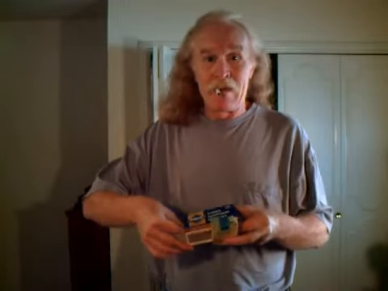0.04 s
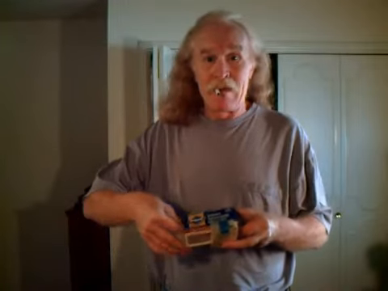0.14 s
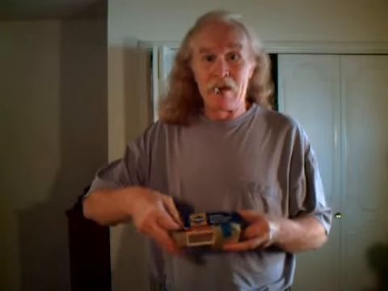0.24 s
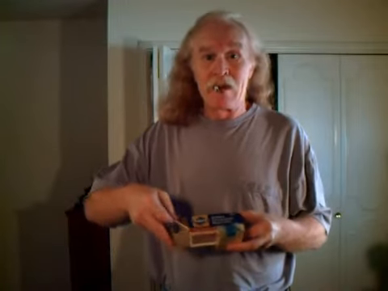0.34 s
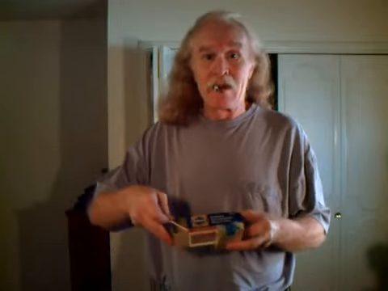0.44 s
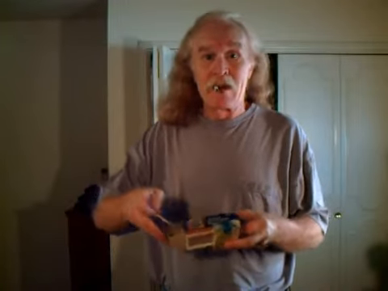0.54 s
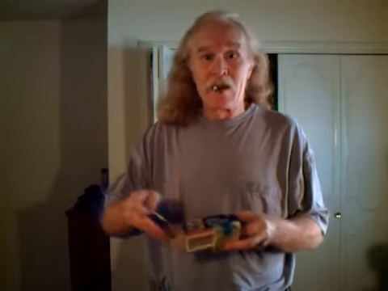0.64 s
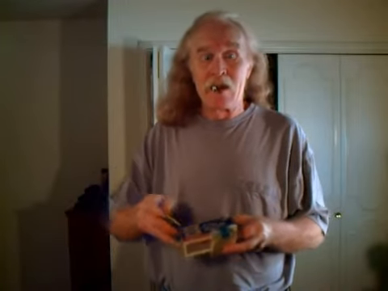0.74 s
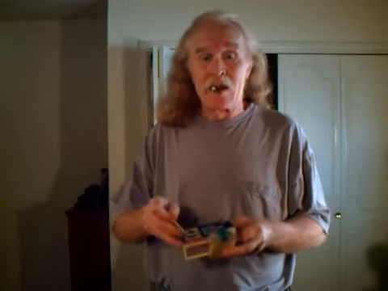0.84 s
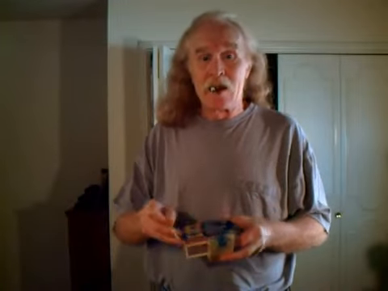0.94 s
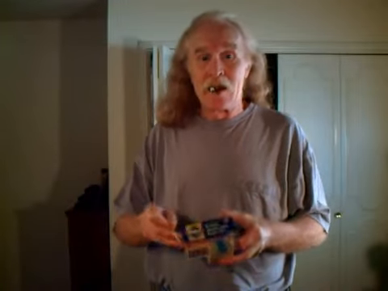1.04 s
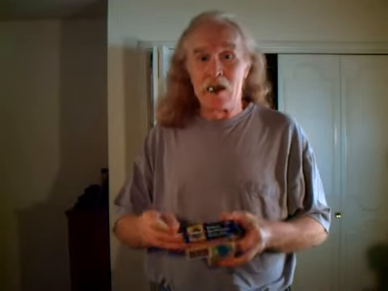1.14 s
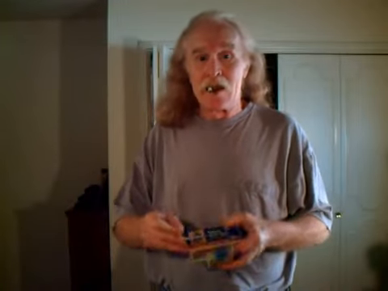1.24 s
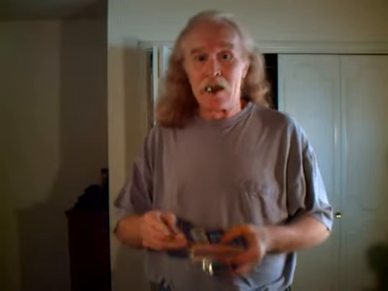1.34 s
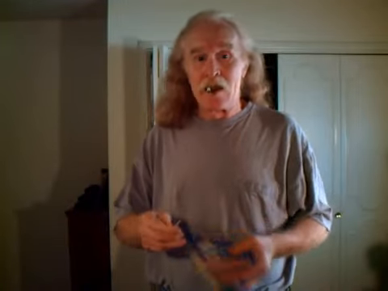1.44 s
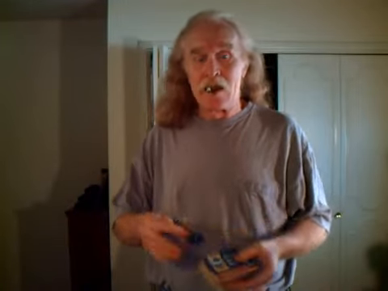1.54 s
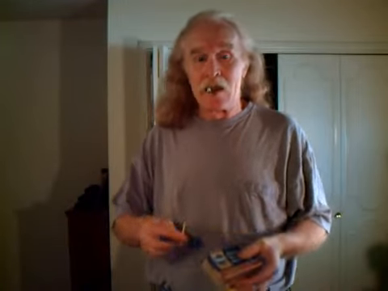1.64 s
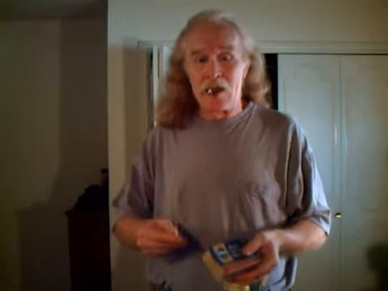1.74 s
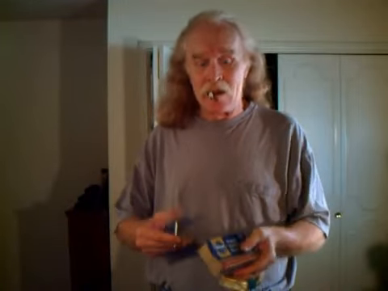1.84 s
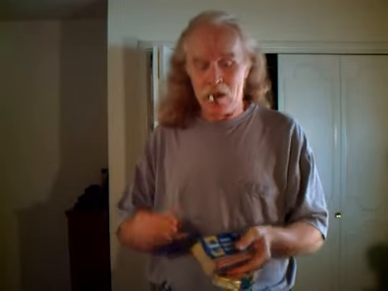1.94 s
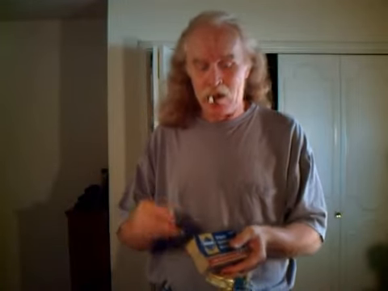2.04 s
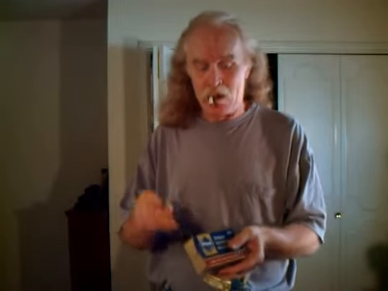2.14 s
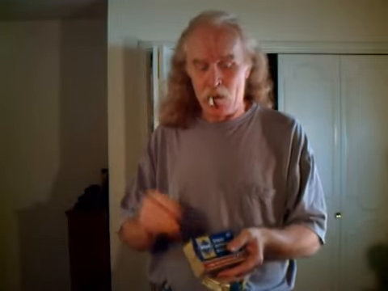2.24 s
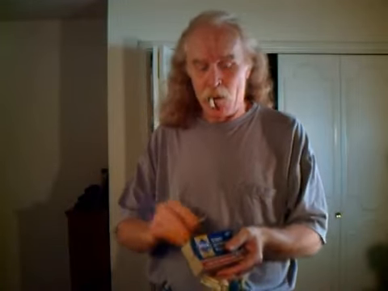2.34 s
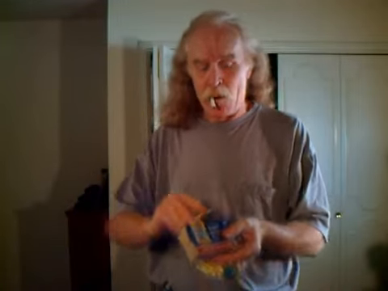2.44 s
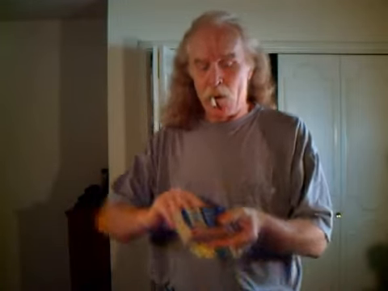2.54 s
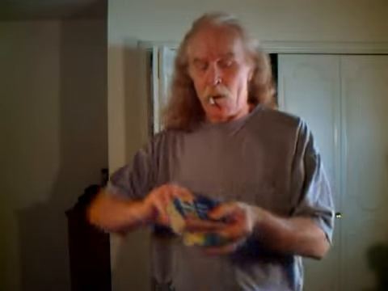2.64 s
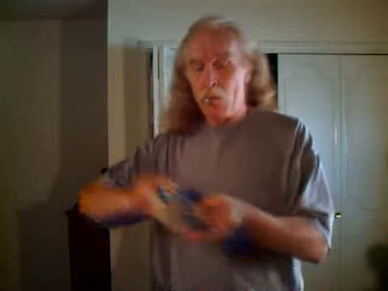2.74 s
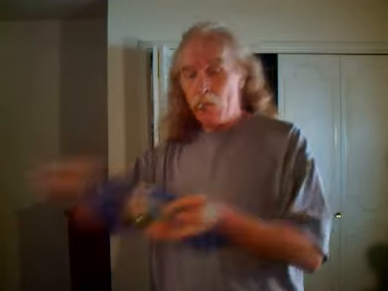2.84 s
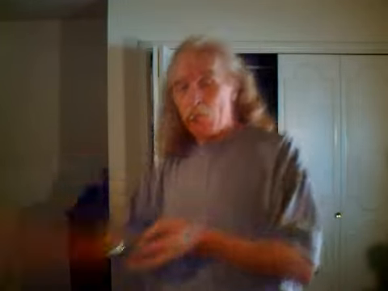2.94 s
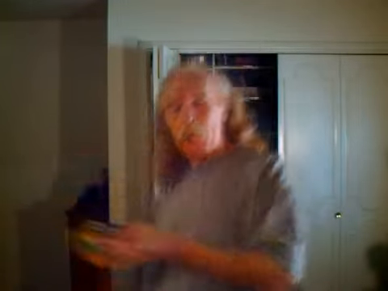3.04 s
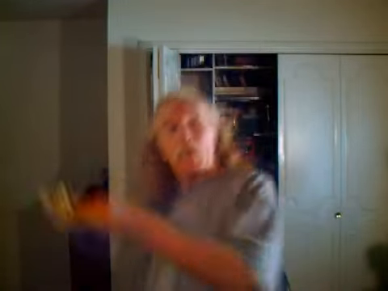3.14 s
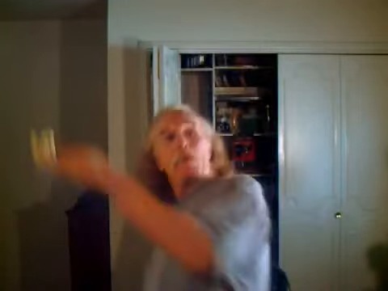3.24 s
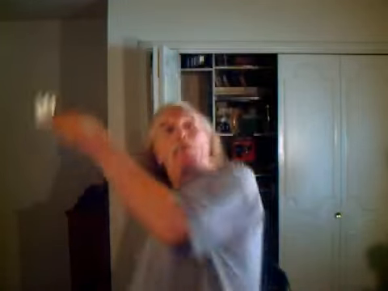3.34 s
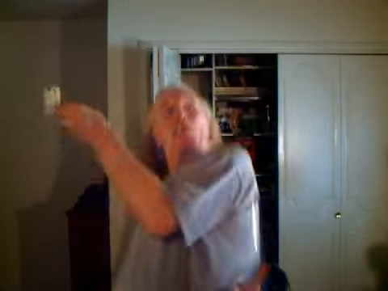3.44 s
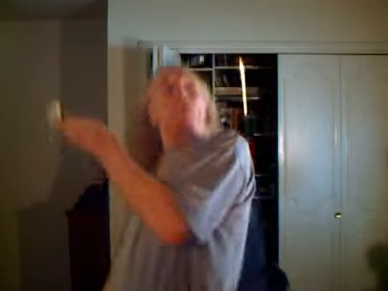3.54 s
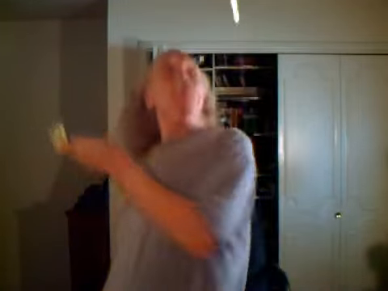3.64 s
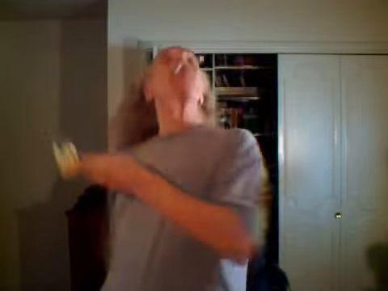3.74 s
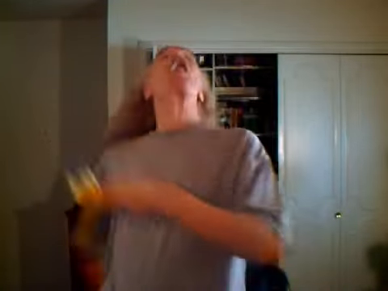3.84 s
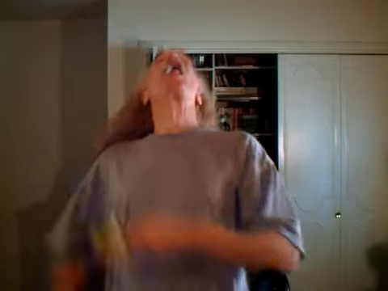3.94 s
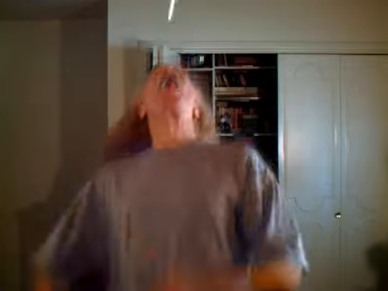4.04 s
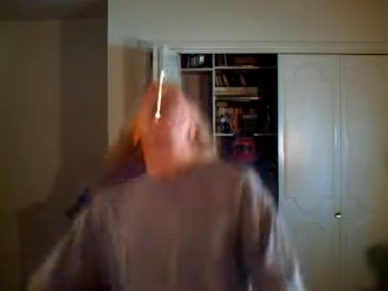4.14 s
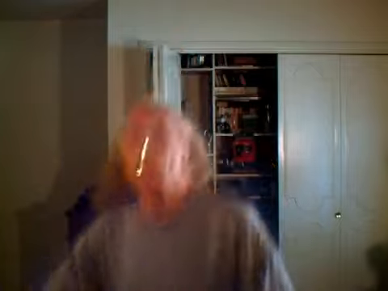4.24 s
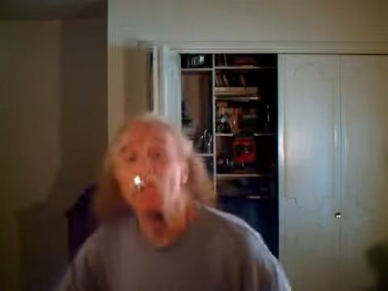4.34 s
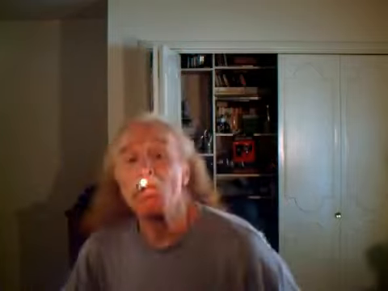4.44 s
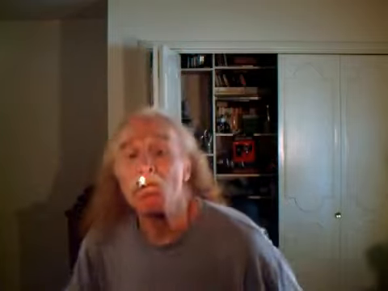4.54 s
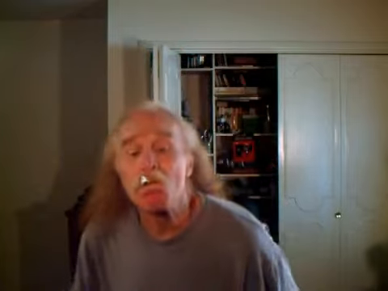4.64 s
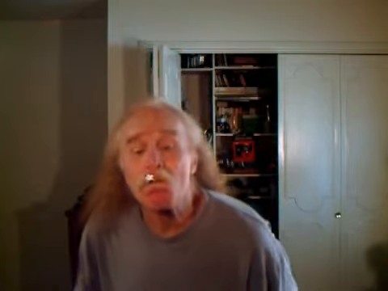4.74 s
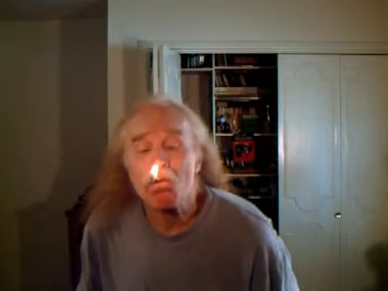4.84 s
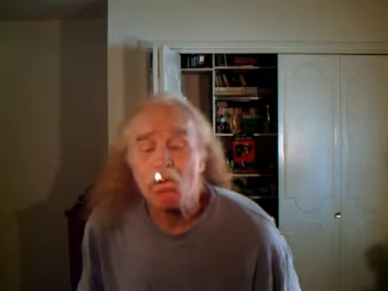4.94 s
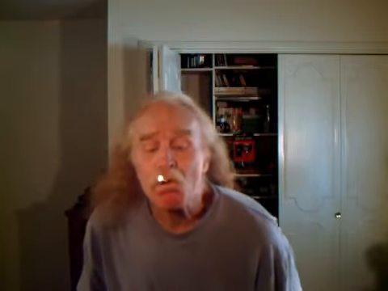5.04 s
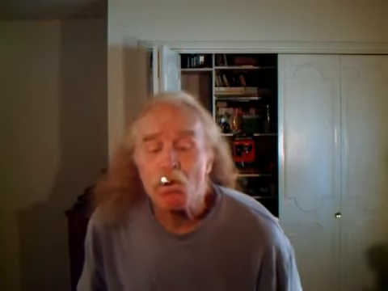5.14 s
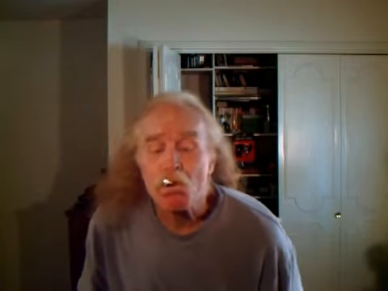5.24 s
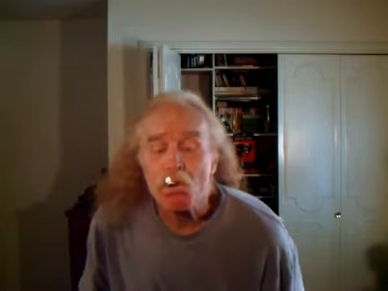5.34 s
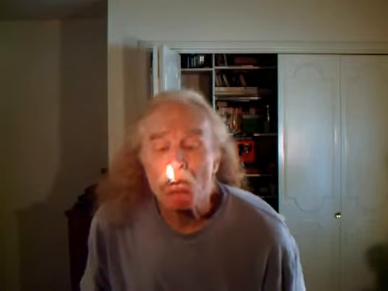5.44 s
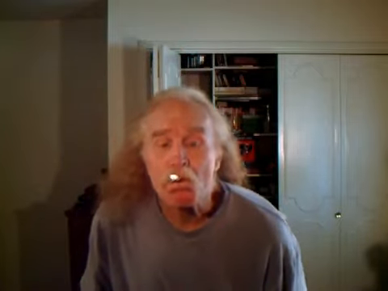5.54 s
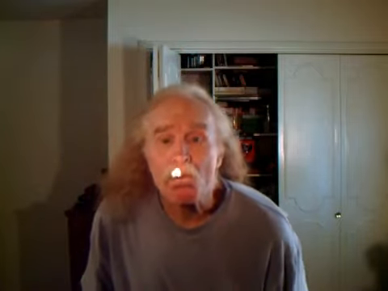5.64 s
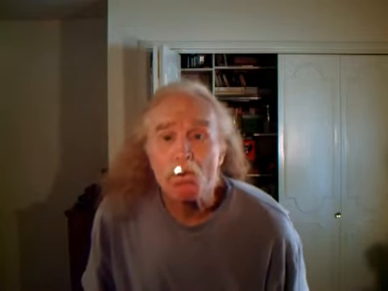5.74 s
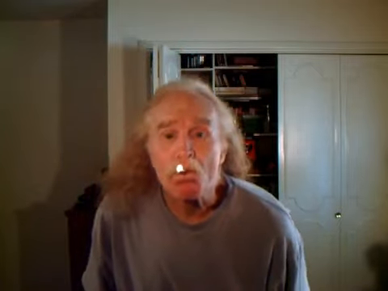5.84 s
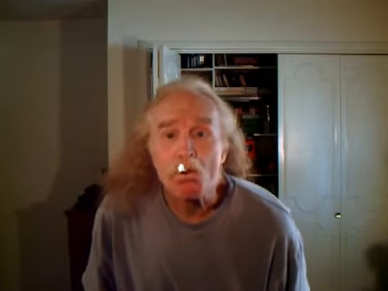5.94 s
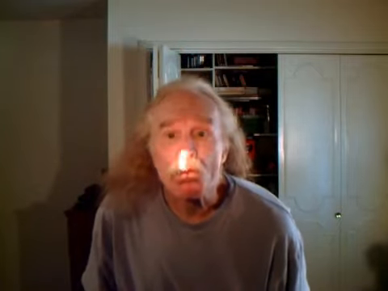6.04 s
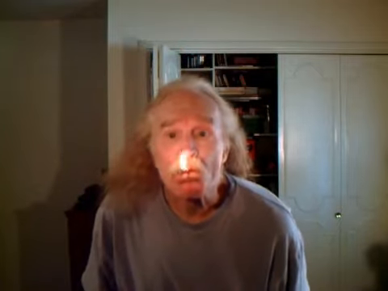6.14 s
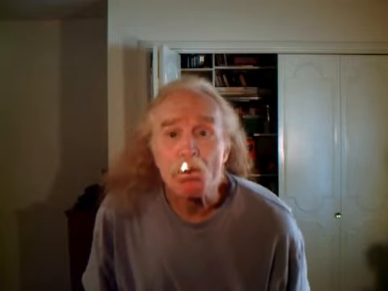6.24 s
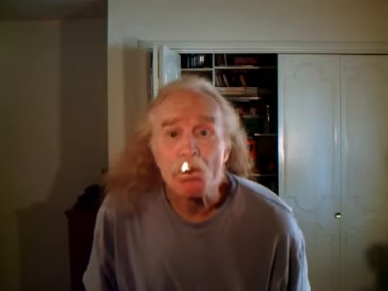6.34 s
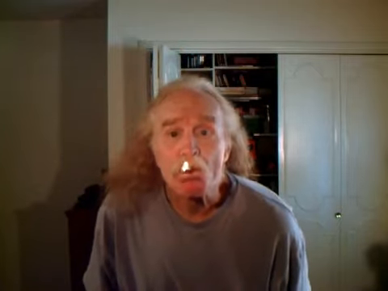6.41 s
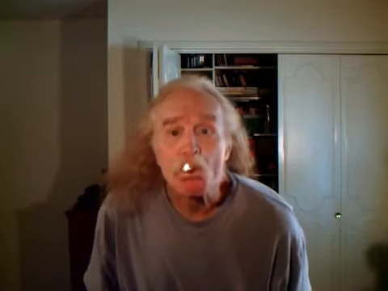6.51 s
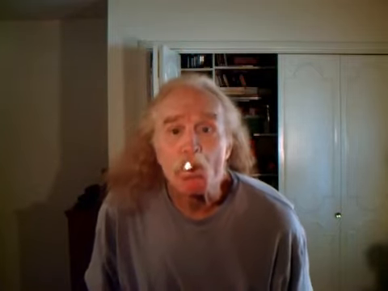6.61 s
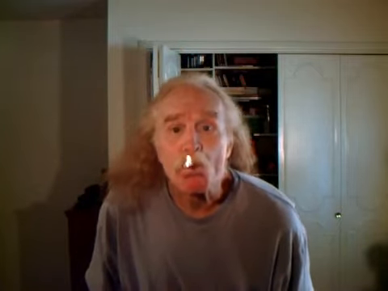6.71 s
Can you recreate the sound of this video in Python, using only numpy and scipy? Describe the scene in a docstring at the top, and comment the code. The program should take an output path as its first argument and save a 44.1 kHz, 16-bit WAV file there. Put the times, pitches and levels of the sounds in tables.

```python
"""A cardboard box of wooden matches is handled, swung and struck in a small room, close to a simple microphone.
Sticks tumble as random taps that ring the hollow box through resonances; harder knocks stand out of the rattle.
Single sticks ping as dying sines; bumps, the sliding tray and the swinging body are bands of noise and low tones.
Under it lie shaped room noise, a mains hum, a drone that comes and goes, thin whine lines and a throbbing hiss."""
import sys
import numpy as np
from scipy import signal
from scipy.fft import rfft, irfft
from scipy.io import wavfile
from scipy.ndimage import uniform_filter1d

SR = 44100
rng = np.random.default_rng(int(sys.argv[2]) if len(sys.argv) > 2 else 0)


def log_audio(samples):
    """Write samples as a 16-bit WAV file to the path given in sys.argv[1]."""
    # one column per channel
    frames = np.atleast_2d(samples).T
    # limit to full scale, then quantise
    limited = np.clip(frames, -1, 1)
    pcm = np.round(limited * 32767).astype(np.int16)
    wavfile.write(sys.argv[1], SR, pcm)


N = 298601

# shakes of the box, each building, holding and settling; the last two levels are against level_db:
# top_s, build_s, hold_s, level_db (low box modes, before the random waver), upper_modes_db, stick_clicks_db
SHAKES = [(0.0, .01, 0.005, -37, 4.5, -10.5), (0.163, 0.072, 0.084, -39.5, 8.5, -5),
          (0.517, 0.13, 0.12, -38.5, 6.5, -7), (0.624, 0.1, 0.091, -45, 15.5, 1),
          (0.75, 0.053, 0.039, -45, -1, -1.5), (0.822, 0.016, 0.012, -40.5, 10, -11.5),
          (0.946, 0.072, 0.022, -38.5, 0.5, -13), (1.023, 0.051, 0.054, -33.5, 8, -3),
          (1.233, 0.12, 0.081, -41, 4, -12), (1.357, 0.031, .06, -40.5, -1, -16.5),
          (1.462, 0.023, 0.062, -37.5, 1.5, -13.5), (1.573, 0.037, 0.031, -35.5, 1.5, -12),
          (1.643, .03, 0.05, -35, 3, -9), (1.794, .04, 0.067, -41, 3, -14),
          (2.037, 0.27, 0.23, -56.5, -1, -14), (2.702, .015, 0.23, -46, -4, -16),
          (2.86, 0.011, 0.048, -42, -8.5, -12), (2.913, 0.048, 0.043, -39.5, 6, -7.5),
          (3.047, 0.0086, 0.066, -24.5, 8.5, -2.5), (3.18, .06, 0.041, -25, 4.5, -7),
          (3.278, .05, 0.034, -32.5, 10.5, -1), (3.505, .15, 0.24, -43, -0.5, -9.5),
          (3.731, 0.09, 0.077, -32, 10, -4), (3.87, .03, .02, -43.5, 2, -3),
          (3.93, 0.018, 0.016, -45.5, 7, -3), (4.053, 0.11, 0.023, -37, 1.5, -11),
          (4.127, 0.14, 0.12, -40, 2.5, -7), (4.298, 0.056, 0.035, -34, 6, -4),
          (4.411, 0.088, 0.051, -32, 9.5, -5), (4.53, 0.051, 0.022, -33.5, 8, -4),
          (4.58, .03, 0.069, -40.5, 7, -8), (4.697, 0.013, .02, -49.5, 6, -1.5),
          (4.858, .15, 0.22, -52.5, -6, -19), (4.993, .01, .03, -48, 5, -3.5),
          (5.087, .04, .05, -59, 9, -2)]
# knocks of sticks on the box, the last two levels against level_db: start_s, level_db, upper_modes_db, sticks_db
KNOCKS = [(0.145, -24.5, 2, -8), (0.172, -17, -1, -15.5), (0.236, -22.5, -1, -11.5), (0.319, -38.5, 6, -2),
          (0.504, -28.5, 6.5, -7), (0.532, -31.5, 8.5, -16), (0.609, -19, 0, -13), (0.63, -15.5, 4.5, -23),
          (0.64, -23, 2, -20), (0.677, -17.5, 7, -5), (0.7, -48, -9, -9), (0.75, -27.5, 5.5, -13),
          (0.823, -24.5, 4, -10.5), (0.959, -25.5, -2.5, -12), (1.012, -25, -0.5, -9), (1.057, -20, 0, -13),
          (1.085, -19.5, -4, -26), (1.218, -32, 2, -12), (1.245, -25.5, -7, -21), (1.276, -24, -2, -25),
          (1.386, -27.5, -2.5, -20), (1.475, -20.5, 2, -13), (1.569, -31, 5.5, -13),
          (1.637, -20, -1.5, -16), (1.668, -21, -1, -11.5), (1.813, -28, 0, -11.5), (1.867, -27.5, -7, -22),
          (2.696, -25.5, -15, -26), (2.778, -36, -4, -17), (2.854, -24.5, 2.5, -9), (2.905, -24, -0.5, -12),
          (2.919, -22.5, 3.5, -13), (2.941, -24.5, 2, -8.5), (3.051, -11, -2, -5), (3.07, -9, -14, -18),
          (3.094, -5, -2, -13.5), (3.106, -12, 6, -10), (3.124, -15, 8, -7), (3.176, -15, 2, -8.5),
          (3.2, -15.5, -0.5, -8), (3.266, -15.5, -3, -19), (3.283, -11.5, -3.5, -14),
          (3.313, -13.5, 0, -11.5), (3.7, -23, -9, -19), (3.736, -17.5, -3, -13), (3.799, -27, 7, -15),
          (3.882, -31.5, 7.5, -13), (3.934, -37, 10, -13), (4.011, -30.5, -2, -10), (4.046, -27, 5, -16),
          (4.252, -28.5, 4, -14), (4.276, -23, -4, -18), (4.304, -16.5, -0.5, -14), (4.329, -20, 2.5, -10),
          (4.377, -26, 8, -13), (4.402, -21, 0, -7.5), (4.415, -11.5, 2, -7.5), (4.431, -6.5, -4, -17),
          (4.443, -9.5, -5, -16.5), (4.516, -11, -8, -18), (4.533, -17, 3, -7.5), (4.697, -28.5, 2, -13),
          (4.809, -47.5, 7.5, -7), (4.956, -33.5, -5.5, -18), (4.998, -24.5, -1.5, -18.5),
          (5.131, -44, 4, -3), (5.426, -42.5, -1.5, -13), (5.577, -46.5, 1, -16)]
# low modes of the hollow box: pitch_hz, width_hz, level_db
LOW_BOX_MODES = [(365, 41, -25), (547.3, 27, -5), (662.3, 82, 1.5), (763.7, 66, 4), (888, 73, -7)]
# upper modes of the hollow box: pitch_hz, width_hz, level_db
UPPER_BOX_MODES = [(1080, 140, 5), (1164, 250, 11.5), (1483, 320, 5), (1700, 300, 5), (1910, 370, -0.5)]
# the grip bends the box: time_s, low_pitch_factor, upper_pitch_factor
GRIP = [(0, 1.054, 0.97), (1.05, 1.034, 0.98), (1.3, 1.08, .97), (1.9, 1.01, 1.017), (2.7, 1.006, 0.98),
        (3.1, 0.967, 0.97), (3.4, 1.014, 1.054), (4.05, 0.946, 1.003), (4.45, 1.003, 1.047),
        (4.7, 1.06, 1.05), (5., 0.93, 0.97)]
# spectrum of clicking wood: pitch_hz, level_db
STICK_SPECTRUM = [(1500, -26.5), (2200, -1), (2500, -4.5), (2900, 0), (3600, -5.5), (4200, -4), (5200, -10),
                  (6000, -11), (6900, -9.5), (8200, -14.5), (9200, -18.5), (10200, -26)]
# single sticks that ring with a clear note:
# start_s, level_db (before the random flicker), pitch_hz, upper_note_db (against the first note)
PINGS = [(0.5038, -38, 2750, -13), (0.629, -36, 2950, -7), (0.75, -37, 4450, -5), (0.957, -42, 2870, -7),
         (1.0576, -40, 3090, -7), (2.1724, -48, 2630, -8), (2.9186, -39, 4200, -2.5),
         (3.052, -16.5, 2930, -6), (3.0697, -21, 2930, -16), (3.095, -17, 4150, -2.5),
         (3.1637, -21, 3000, -11), (3.1765, -17, 2910, -13), (3.1896, -23.5, 4100, -5),
         (3.7958, -35, 3080, -12), (4.128, -34, 3930, -5), (4.147, -32, 4150, -5.5),
         (4.1663, -39, 2860, -6), (4.1834, -44, 4060, -6), (4.2485, -47, 3960, -8),
         (4.2734, -37, 2940, -10), (4.288, -37, 2880, -11), (4.3044, -25.5, 2860, -16),
         (4.3317, -33, 2620, -11), (4.512, -26, 4450, -5.5)]
# soft bumps around the deepest note of the box: top_s, build_s, hold_s, level_db
BUMPS = [(0.023, .03, .05, -59), (0.167, .03, 0.066, -55), (2.69, .01, 0.013, -52),
         (3.072, 0.038, 0.055, -41), (3.18, .03, 0.024, -48), (3.502, 0.053, .04, -55.5),
         (3.716, 0.044, 0.086, -52.5), (4.016, .015, 0.027, -51), (4.166, .04, 0.042, -56)]
# tray sliding in its sleeve: time_s, level_db, pitch_hz
TRAY_SLIDE = [(4.1, -55, 1240), (4.13, -45.5, 1290), (4.19, -42.5, 1390), (4.23, -43, 1230),
              (4.27, -40, 1235), (4.33, -29.5, 1100), (4.36, -50, 1130)]
# low rumble of the body swinging: top_s, build_s, hold_s, level_db
BODY_SWINGS = [(2.957, 0.18, 0.12, -55.5), (3.283, .1, 0.15, -53.5), (3.69, 0.1, 0.032, -52),
               (4.324, 0.18, .12, -59), (4.613, 0.21, 0.019, -57), (5.025, .1, 0.055, -66.5)]
# low drone that comes and goes: top_s, build_s, hold_s, level_db
DRONE_SWELLS = [(3.3, .06, 0.018, -48), (3.6, 0.09, 0.18, -62), (4.05, .2, 0.97, -57)]
# decay of the room: pitch_hz, t60_s
ROOM_DECAY = [(300, 0.7), (800, 0.47), (2000, 0.42), (6000, 0.36)]
# spectrum shape of the air noise: pitch_hz, level_db (per Hz, relative)
AIR_SPECTRUM = [(15, -25.5), (25, -2.5), (60, -11), (100, -10), (150, -16), (230, -22.5), (400, -22),
                (1100, -23.5), (1500, -28.5), (3000, -29.5), (4400, -32.5), (6500, -36), (8000, -38.5),
                (9200, -51), (10200, -64.5)]
# steady whine lines: pitch_hz, level_db
WHINE_LINES = [(2000.5, -66), (4000.7, -87.5), (7025, -98.5), (9027, -85.5)]
# bands of the throbbing hiss, before its steps: pitch_hz, width_hz, level_db
THROB_BANDS = [(3000, 500, -82), (5050, 650, -76), (5950, 650, -76)]
# the four steps in every tenth of a second: level_db
THROB_STEPS = [7.5, -6, 4.5, 0.5]

SHAKE_CLIMB_DB, SHAKE_FALL_DB_PER_S, CLICK_FALL_DB_PER_S = 19.5, 258, 333.5
PING_T60_S, PING_RISE_S, PING_UPPER_HZ = 0.033, 0.0016, 6890
THUD_S, THUD_DB, THUD_HZ = 3.266, -28.5, 151
THUD_ARCH = 0.23  # share by which the thud's pitch arches up
AIR_DB, HUM_HZ, HUM_DB = -54.5, 119.3, -58.5
FAN_TONE_HZ, FAN_TONE_WIDTH_HZ, FAN_TONE_DB = 340, 41, -64  # a fuzzy fan-like tone
BAND_EDGE_HZ = 10266


def box():
    """Rattle and knocks ring the hollow box, whose pitch shifts with the grip, and the sticks."""
    low, upper, bright = knocks() + rattle()
    card = ring(low, LOW_BOX_MODES, follow(GRIP, 1))
    card += ring(upper, UPPER_BOX_MODES, follow(GRIP, 2))
    # the box is too small to radiate bass
    high_pass = signal.butter(3, 310, "high", fs=SR, output="sos")
    card = signal.sosfilt(high_pass, card)
    return card + colour(bright, STICK_SPECTRUM) + pings() + bumps()


def rattle():
    """Loose sticks tap the walls: the drive of the low box modes, the upper box modes and the sticks."""
    fall = np.array([[SHAKE_FALL_DB_PER_S], [SHAKE_FALL_DB_PER_S], [CLICK_FALL_DB_PER_S]])
    power = 0
    for top_s, build_s, hold_s, level_db, upper_db, clicks_db in SHAKES:
        shape = swell(top_s, build_s, hold_s, level_db, SHAKE_CLIMB_DB, fall)
        power = power + (shape * gain_of([[0], [upper_db], [clicks_db]])) ** 2
    # the rattle sits below its listed level and wavers at random
    waver_db = -3.2 * (1.5 + np.tanh(wander(54)))
    level = np.sqrt(power) * gain_of(waver_db)
    taps = tumble(per_s=450, spread_db=1.5, scuff=0.54)
    # sticks also click on each other
    clicks = evened(taps + 1.37 * tumble(per_s=1500, spread_db=6.0, scuff=0.97))
    return level * np.array([taps, taps, clicks])


def tumble(per_s, spread_db, scuff):
    """Random taps of very unequal size over a sliding scuff."""
    size = gain_of(spread_db * np.minimum(rng.exponential(1, N), 4))
    size *= rng.choice([-1., 1.], N)
    taps = evened(size * (rng.random(N) < per_s / SR))
    return evened(taps + scuff * rng.standard_normal(N))


def knocks():
    """Each knock is a firm blow on the card, its rebound and a clump of small taps."""
    length = 800
    t = np.arange(length) / SR
    chance = rng.standard_normal((len(KNOCKS), length + 1))
    clumps = chance[:, 1:] * np.exp(-t / 0.011) * np.minimum(t / 0.00063, 1)
    clumps *= 0.33 / np.sqrt(np.mean(clumps[:, :130] ** 2, axis=1))[:, None]
    rebound_at = np.round(SR * (0.00303 + 0.00163 * np.tanh(chance[:, :1])))
    blows = 5.15 * (t == 0) + 3.9 * (np.arange(length) == rebound_at) + 0.48 * clumps
    drive = np.zeros((3, N))
    for (start_s, db, upper_db, sticks_db), blow, clump in zip(KNOCKS, blows, clumps):
        i = round(start_s * SR)
        gains = gain_of([[db], [db + upper_db], [db + sticks_db]])
        drive[:, i:i + length] += gains * [blow, blow, clump]
    return drive


def pings():
    """Two dying notes for each ringing stick, their level flickering at random so they sound rough."""
    t, out = np.arange(2000) / SR, np.zeros(N)
    for start_s, db, hz, upper_db in PINGS:
        notes = np.sin(2 * np.pi * hz * t)
        notes += gain_of(upper_db) * np.sin(2 * np.pi * PING_UPPER_HZ * t)
        decay = gain_of(db - 60 * t / PING_T60_S)
        out[round(start_s * SR):][:2000] += decay * np.minimum(t / PING_RISE_S, 1) * notes
    flicker = 0.71 + 0.73 * wander(300)
    return out * flicker


def bumps():
    """Short swells of noise around the deepest box note."""
    level = sum(swell(*row, climb_db=19.5, fall_db_per_s=401) for row in BUMPS)
    return level * fuzz(366, 120)


def slide():
    """Friction noise whistles in the air space of the box, its pitch gliding as the space shrinks and grows."""
    level = during(TRAY_SLIDE) * gain_of(follow(TRAY_SLIDE, 1))
    return level * fuzz(follow(TRAY_SLIDE, 2), 220)


def thud():
    """The dull thud of the swing: a short rough low tone whose pitch rises and falls back."""
    t = np.arange(N) / SR
    hz = THUD_HZ * (1 + THUD_ARCH * np.exp(-((t - THUD_S - 0.035) / 0.036) ** 2))
    tone = np.sin(2 * np.pi * np.cumsum(hz) / SR)
    tone = tone + 0.37 * fuzz(0.77 * hz, 62) + 0.27 * fuzz(2 * hz, 106)
    level = swell(THUD_S + 0.018, 0.028, 0.018, THUD_DB, climb_db=2, fall_db_per_s=420)
    level = uniform_filter1d(level * (t > THUD_S), size=400)  # softens the onset
    return level * evened(tone)


def rumble():
    """Dull low noise while the body swings."""
    level = sum(swell(*row, climb_db=16.5, fall_db_per_s=109) for row in BODY_SWINGS)
    return level * fuzz(176, 81)


def room(x):
    """Echo of sparse taps of random sign, each band dying at its own speed."""
    taps = np.zeros(SR // 2)
    at = np.arange(200, SR // 2 - 20, 20) + rng.integers(0, 20, (SR // 2 - 201) // 20)
    taps[at] = rng.choice([-1., 1.], len(at))
    hz, t, bands = signal.stft(taps, SR, nperseg=256)
    decay = gain_of(-60 * t / read(ROOM_DECAY, hz)[:, None])
    tail = signal.istft(bands * decay, SR, nperseg=256)[1]
    return signal.fftconvolve(x, tail / np.linalg.norm(tail))[:N]


def drone():
    """A sine pitched below the hum, wavering in pitch and level, that swells and fades."""
    tone = np.sin(2 * np.pi * np.cumsum(98 + 2.62 * wander(6.8)) / SR)
    tone *= 1 + 0.23 * wander(7.8)
    level = sum(swell(*row, climb_db=17.5, fall_db_per_s=112) for row in DRONE_SWELLS)
    return evened(tone) * level


def background():
    """Shaped room and circuit noise, a hum that wavers a little, a fuzzy tone and steady whine lines."""
    hz, t = np.fft.rfftfreq(N, 1 / SR), np.arange(N) / SR
    shaped = irfft(rfft(rng.standard_normal(N)) * gain_of(read(AIR_SPECTRUM, hz)), N)
    air = gain_of(AIR_DB) * evened(shaped)
    hum_level = gain_of(HUM_DB + 1.2 * np.tanh(wander(10)))
    hum = hum_level * np.sqrt(2) * np.sin(2 * np.pi * HUM_HZ * t + 0.2 * wander(5.4))
    fan_tone = gain_of(FAN_TONE_DB) * fuzz(FAN_TONE_HZ, FAN_TONE_WIDTH_HZ)
    whine = sum(gain_of(db) * np.sqrt(2) * np.sin(2 * np.pi * f * t) for f, db in WHINE_LINES)
    return air + hum + fan_tone + whine


def throb():
    """High hiss switched in uneven steps, in a pattern that repeats ten times a second."""
    step = ((np.arange(N) / SR + 0.045) * 40).astype(int)
    chance_db = 2.1 * np.tanh(rng.standard_normal(step[-1] + 1))
    step_db = np.array(THROB_STEPS)[step % 4] + chance_db[step]
    hiss = sum(gain_of(db) * fuzz(hz, width) for hz, width, db in THROB_BANDS)
    return uniform_filter1d(gain_of(step_db), size=150) * hiss


def gain_of(db):
    """Decibels to amplitude."""
    return 10 ** (np.asarray(db) / 20)


def evened(x):
    """Scales to rms 1."""
    return x / np.sqrt(np.mean(x ** 2) + 1e-20)


def read(points, hz):
    """Reads a spectrum on a log-frequency axis."""
    f, value = np.transpose(points)
    return np.interp(np.log(hz + 1), np.log(f + 1), value)


def follow(rows, column):
    """One column of a curve at every sample."""
    rows = np.asarray(rows)
    return np.interp(np.arange(N) / SR, rows[:, 0], rows[:, column])


def during(rows):
    """One while a curve lasts, else zero."""
    t = np.arange(N) / SR
    return (t >= rows[0][0]) & (t < rows[-1][0])


def swell(top_s, build_s, hold_s, db, climb_db, fall_db_per_s):
    """An amplitude that climbs to its top, holds and dies away, in straight lines of decibels."""
    t = np.arange(N) / SR - top_s
    climb = climb_db * np.minimum(t, 0) / max(build_s, 0.001)
    fall = fall_db_per_s * np.maximum(t - hold_s, 0)
    return gain_of(db + climb - fall)


def resonate(x, hz, width, order=1):
    """Shifts the pitch hz down to zero, smooths, and shifts back: a resonance, steeper with order."""
    turn = np.exp(2j * np.pi * np.cumsum(hz * np.ones(len(x))) / SR)
    r = np.exp(-np.pi * width / SR)
    smooth = signal.lfilter([(1 - r) ** order], np.poly([r] * order), x / turn)
    return 2 * (turn * smooth).real


def ring(x, modes, pitch):
    """A set of steep modes, scaled so that white drive of rms 1 comes out near rms 1."""
    out = sum(gain_of(db) * resonate(x, hz * pitch, width, order=2) for hz, width, db in modes)
    power = sum(gain_of(2 * db) * np.pi * width / SR for hz, width, db in modes)
    return out / np.sqrt(power)


def colour(x, points):
    """Causal filter of the given spectrum and energy 1: phase from the Hilbert transform of the log gain."""
    log_gain = np.log(gain_of(read(points, abs(np.fft.fftfreq(4096, 1 / SR)))))
    taps = np.fft.ifft(np.exp(np.conj(signal.hilbert(log_gain)))).real[:1024]
    return signal.oaconvolve(x, taps / np.linalg.norm(taps))[:N]


def wander(hz):
    """Smoothed chance of rms 1, faster with hz."""
    return evened(resonate(rng.standard_normal(N), 0, hz))


def fuzz(hz, width):
    """Noise in a steep narrow band, rms 1."""
    return evened(resonate(rng.standard_normal(N), hz, width, order=2))


def scene():
    """Box close by, its echo, the swinging body and the background."""
    near = box() + slide()
    echo = gain_of(-6.5) * room(near)
    mix = near + echo + thud() + rumble() + drone() + background() + throb()
    return mix[None]


def record(dry):
    """The band limit of the recorder: a steep low-pass."""
    low_pass = signal.firwin(511, BAND_EDGE_HZ, window=("kaiser", 9), fs=SR)
    return signal.oaconvolve(dry, low_pass[None], "same")


dry = scene()
out = record(dry)
log_audio(out)
```